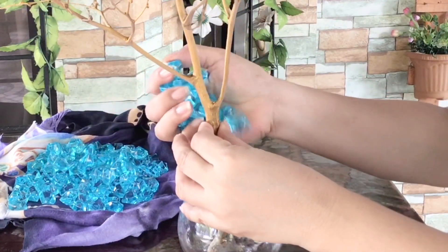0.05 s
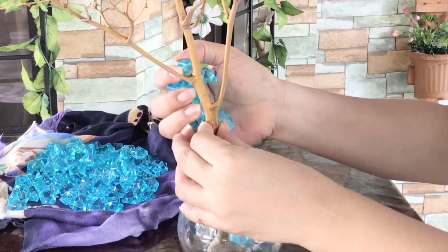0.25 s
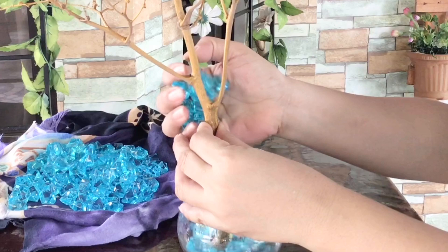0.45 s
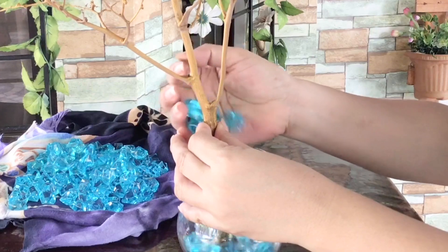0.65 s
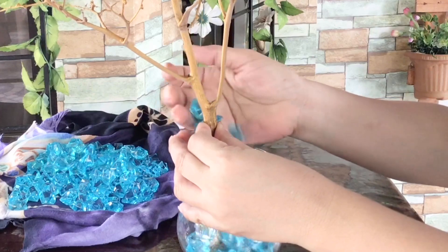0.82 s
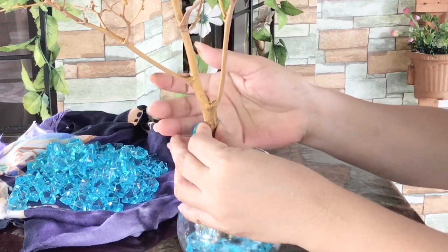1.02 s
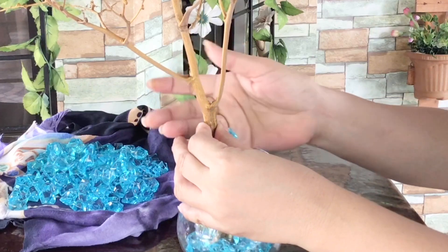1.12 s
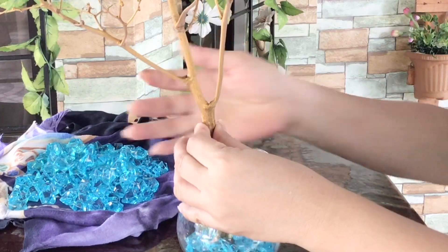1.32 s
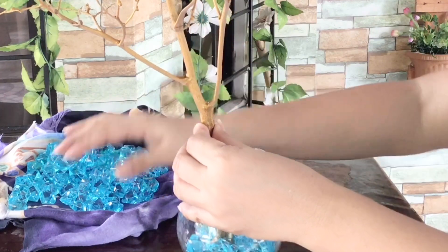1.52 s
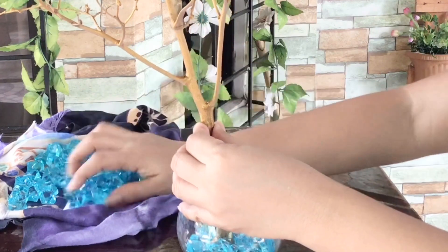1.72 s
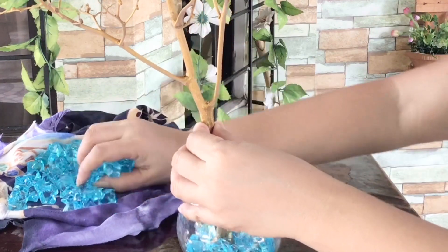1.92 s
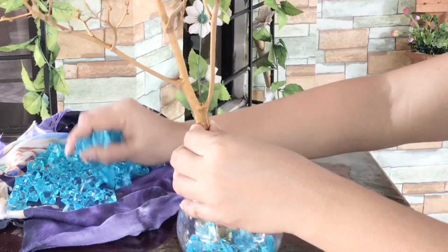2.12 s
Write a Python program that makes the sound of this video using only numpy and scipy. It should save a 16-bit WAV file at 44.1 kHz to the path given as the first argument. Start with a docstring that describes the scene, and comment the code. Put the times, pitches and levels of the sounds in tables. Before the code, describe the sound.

Little stones drop clinking into a glass jar, then a hand rustles through the pile.

```python
"""Small hard stones drop into a glass jar, close up, in a small reflective space.
Each stone ticks, rings briefly, sets the glass wall singing and knocks the jar; lighter contacts
chatter in between, and glancing blows add dry clacks and bright scratches. Then the hand rustles
into the pile of stones on a cloth for more. Two faint falling tones, room tone and a hum sit beneath."""
import sys
import numpy as np
from scipy import signal
from scipy.fft import rfft, irfft
from scipy.io import wavfile

SR = 44100
rng = np.random.default_rng(int(sys.argv[2]) if len(sys.argv) > 2 else 0)


def pcm_store(signal):
    """Save signal as 16-bit PCM."""
    levels = np.round(np.clip(np.atleast_2d(signal), -1, 1) * 32767)
    wavfile.write(sys.argv[1], SR, levels.astype(np.int16).T)


N = 94815

# room tone EQ (frequency [Hz], level [dB])
ROOM_TONE_EQ = [(30, -26), (60, -7.5), (130, 1.5), (240, -10), (500, -10.5), (1200, -16.5), (2700, -30),
                (8000, -31), (16000, -56)]
# stones shifting in the hand or the pile (time [s], level [dB])
STONE_SHIFTS = [(0.036, -31), (1.633, -25), (1.8153, -14.5), (2.082, -24)]
# envelope of the hand rubbing through the pile (time [s], level [dB])
RUSTLE_ENVELOPE = [(1.6, -77.5), (1.68, -56.5), (1.74, -41), (1.775, -41.5), (1.8, -53), (1.878, -54.5),
                   (1.897, -38), (1.932, -38.5), (2.02, -70.5)]
# rustle EQ (frequency [Hz], level [dB])
RUSTLE_EQ = [(200, -24.5), (800, -10), (3200, -1.5), (6400, -3), (9200, -11.5), (11500, -32), (16000, -42)]
# landings, before layer trims (time [s], click [dB], upper wall [dB], lower wall [dB], knock [dB])
LANDINGS = [(0.1274, -38, -49, -30, -42), (0.2108, -10.5, -16, -42, -42), (0.2168, -27, -31, -59, -27.5),
            (0.2632, -23, -18, -31.5, -29.5), (0.3732, -20.5, -18.5, -47, -33.5),
            (0.3971, -15, -30, -58, -34), (0.4261, -36, -50, -27, -29), (0.4459, -21, -50, -34.5, -27),
            (0.4635, -22.5, -17, -28, -37.5), (0.4807, -36, -20.5, -32, -51),
            (0.4895, -23, -31, -46, -33.5), (0.4961, -26, -29, -41, -39), (0.5229, -30, -24, -40.5, -32),
            (0.5413, -19, -33.5, -51, -34.5), (0.5621, -39, -38, -32, -30), (0.5776, -27, -38, -49, -41.5),
            (0.6071, -33.5, -18.5, -49, -34), (0.6439, -20.5, -16.5, -56, -37),
            (0.6835, -34, -29, -57, -31), (0.6903, -12.5, -18.5, -51, -46.5), (0.7402, -20, -15, -31, -36),
            (0.7798, -21, -23, -50, -35.5), (0.8127, -22, -25, -23, -34), (0.8357, -25.5, -19, -30, -41),
            (0.8948, -26, -30.5, -27.5, -38), (0.9103, -27.5, -36, -27, -43), (0.9276, -31, -28, -55, -42),
            (0.9866, -33, -45.5, -29.5, -35.5), (0.9927, -28, -26, -42, -49),
            (1.0256, -22.5, -44, -49, -31.5), (1.0663, -27, -26, -42, -46),
            (1.1292, -22, -22.5, -31, -37.5), (1.1415, -54, -24.5, -42, -71),
            (1.2053, -24.5, -45.5, -53, -32), (1.2099, -17, -25.5, -39, -29),
            (1.2235, -45, -29.5, -30.5, -47), (1.3905, -37, -39.5, -39, -35.5)]
# modes of a stone, the glass wall and the jar's body (frequency [Hz], level [dB], t60 [s])
STONE_MODES = [(6160, -13, 0.018), (7750, -2, 0.022), (7790, -6.5, 0.04), (8480, -18, 0.053)]
UPPER_WALL_MODES = [(4227, -8.5, 0.1), (4360, 0.5, 0.051), (4433, -5.5, 0.12), (4465, -3.5, 0.068),
                    (4580, -9, 0.11), (5600, -12, 0.041)]
LOWER_WALL_MODES = [(2565, -0.66, 0.1), (2616, 0.71, 0.054)]
BODY_MODES = [(547.6, -5, 0.079), (627, -4.5, 0.0492), (807, 0.5, 0.082), (868, -2, 0.068),
              (1312, -5.5, 0.045)]
# contact noise EQs, bright tick and hollow knock (frequency [Hz], level [dB])
TICK_EQ = [(1500, -26), (3900, -6.5), (5200, -10), (5800, 1.5), (6700, -5.5), (7600, 2), (8600, -8.5),
           (10500, -28), (12700, -24.5), (16000, -38)]
KNOCK_EQ = [(100, -33.5), (400, -16.5), (560, -7.5), (850, 4), (1200, -3), (2200, -5.5), (8000, -27.5)]
# sharp edges scratching the glass (time [s], level [dB])
EDGE_SCRATCHES = [(.2108, -8), (.3732, -20), (.524, -19), (.6903, -15.5), (.9866, -16), (1.278, -22.5)]
# stones glancing off without ringing (time [s], level [dB])
DRY_CLACKS = [(.5229, -10), (.5385, -14), (.595, -13), (.768, -15), (.8135, -6.5), (.9866, -7),
              (1.3905, -16.5)]
# envelope of the stones settling (time [s], level [dB])
CHATTER_ENVELOPE = [(.22, -32), (.35, -44), (.58, -33.5), (.87, -29.5), (.97, -42.5), (1.029, -31),
                    (1.18, -44), (1.31, -34)]
# faint falling tones (time [s], length [s], start pitch [Hz], end pitch [Hz], level [dB])
FALLING_CHIRPS = [(.69, 0.025, 308, 45, -37.5), (1.957, 0.0136, 1940, 593, -41)]
# reverb bands (frequency [Hz], t60 [s], level [dB])
REVERB_BANDS = [(248, 0.45, 1.5), (790, 0.38, -4), (2200, 0.53, -2), (4500, 0.3, -1.5), (7400, 0.34, -11.5),
                (12800, 0.14, -1)]

STONE_DB, PING_DB, BODY_DB, TICK_DB, KNOCK_DB = 3.5, -12.5, 4, 19, 21  # layer trims
CHATTER_TRIMS_DB = (-8, -5, -6.5, -12.5)  # click, upper wall, lower wall, knock


def amp(db):
    """Decibels to gain."""
    return 10 ** (np.asarray(db) / 20)


def unit_rms(x):
    """Scales to rms 1."""
    return x / np.sqrt(np.mean(x ** 2) + 1e-20)


def curve_at(points, hz):
    """Reads a table on a log-frequency axis."""
    f, value = np.transpose(points)
    return np.interp(np.log(hz + 1), np.log(f + 1), value)


def add(mix, s, sound):
    """Mixes a sound in at time s."""
    part = mix[max(round(s * SR), 0):][:len(sound)]
    part += sound[:len(part)]


def equalise(x, points, size=4096):
    """Minimum-phase EQ of unit energy."""
    log_gain = np.log(amp(curve_at(points, abs(np.fft.fftfreq(size, 1 / SR)))))
    taps = np.fft.ifft(np.exp(np.conj(signal.hilbert(log_gain)))).real[:size // 2]
    return signal.fftconvolve(x, taps / np.linalg.norm(taps))[:N]


def ring(modes, detune=0, spread_db=2.5, attack_s=0.00028):
    """One blow on a set of modes; where it lands decides their shares."""
    hz, db, t60 = np.transpose(modes)
    t = np.arange(0, t60.max(), 1 / SR)
    share = amp(db + spread_db * rng.standard_normal(len(hz))) * rng.choice([-1, 1], len(hz))
    hz = hz * (1 + detune * rng.standard_normal(len(hz)))
    partials = np.sin(np.outer(2 * np.pi * hz, t)) * amp(np.outer(-60 / t60, t))
    return share / np.linalg.norm(share) @ partials * (1 - np.exp(-t / attack_s))


def contact(t60, snap, rebound_s=.0007, size=2048):
    """A sharp transient, its quick rebound and a dying scrape, of unit energy."""
    burst = rng.standard_normal(size) * amp(-60 * np.arange(size) / SR / t60)
    burst[0] += snap
    burst[int(rebound_s * SR * (.5 + rng.random()))] += snap
    return burst / np.linalg.norm(burst)


def ambience(hum_hz=124.8, glass_hz=2630, fade_db_per_s=33.5):
    """A noise bed: quiet room tone, a wavering low hum and a faint glassy ring that fades out."""
    hz, t = np.fft.rfftfreq(N, 1 / SR), np.arange(N) / SR
    shapes = [amp(curve_at(ROOM_TONE_EQ, hz)),
              1 / (1 + ((hz - hum_hz) / 16) ** 2),
              1 / (1 + ((hz - glass_hz) / 480) ** 2)]
    spectra = rfft(rng.standard_normal((3, N))) * shapes
    tone, hum, glass = map(unit_rms, irfft(spectra, N))
    return amp(-55) * tone + amp(-58) * hum + amp(-57.5 - fade_db_per_s * t) * glass


def pile_rustle(grains_per_s=7000, spread_db=4):
    """Fingers push through stones on cloth: dense tiny grains and a few clearer ticks."""
    grains = rng.standard_normal(N) * amp(spread_db * np.minimum(rng.exponential(1, N), 4))
    grains *= rng.random(N) < grains_per_s / SR
    t = np.arange(N) / SR
    envelope = amp(np.interp(t, *np.transpose(RUSTLE_ENVELOPE))) * (t > RUSTLE_ENVELOPE[0][0])
    friction = unit_rms(grains) * envelope
    for s, db in STONE_SHIFTS:
        add(friction, s, amp(db) * contact(t60=0.047, snap=3.4))
    return equalise(friction, RUSTLE_EQ)


def jar_hits(ping_range_hz=(4510, 9200), ping_t60=0.016, wall_detune=0.0043):
    """Every hit ticks, rings the stone and the glass wall, and knocks the jar."""
    rings, ticks, knocks = np.zeros((3, N))
    for s, click_db, upper_db, lower_db, knock_db in [*LANDINGS, *chatter()]:
        add(rings, s, amp(click_db + STONE_DB) * ring(STONE_MODES, detune=0.011))
        ping_hz = np.interp(rng.random() ** 2, [0, 1], ping_range_hz)  # each stone's own faint note
        add(rings, s, amp(click_db + PING_DB) * ring([(ping_hz, 0, ping_t60)]))
        add(rings, s, amp(upper_db) * ring(UPPER_WALL_MODES, wall_detune))
        add(rings, s, amp(lower_db) * ring(LOWER_WALL_MODES, wall_detune))
        add(rings, s, amp(knock_db + BODY_DB) * ring(BODY_MODES, detune=0.019))
        add(ticks, s, amp(click_db + TICK_DB) * contact(t60=0.011, snap=2.8))
        add(knocks, s, amp(knock_db + KNOCK_DB) * contact(t60=0.033, snap=4.6))
    return rings + equalise(ticks, TICK_EQ) + equalise(knocks, KNOCK_EQ)


def glancing_blows(cues, band_hz, t60):
    """Band-passed snaps: dry woody clacks when low, bright scratches when high."""
    out = np.zeros(N)
    band = signal.butter(2, band_hz, "bandpass", fs=SR, output="sos")
    for s, db in cues:
        burst = signal.sosfilt(band, contact(t60, snap=5.5))
        add(out, s, amp(db) * burst / np.linalg.norm(burst))
    return out


def chatter(hits_per_s=70, spread_db=6):
    """Cues for light random hits as the stones settle, in the same columns as LANDINGS."""
    s, db = np.transpose(CHATTER_ENVELOPE)
    jitter = rng.random((400, 5))
    times = s[0] + (np.arange(len(jitter)) + 2 * jitter[:, 0]) / hits_per_s
    levels = np.interp(times, s, db)[:, None] + CHATTER_TRIMS_DB + spread_db * (2 * jitter[:, 1:] - 1)
    return np.column_stack([times, levels])[times < s[-1]]


def falling_chirps():
    """Two faint falling tones: a low sinking thump and a short higher chirp."""
    out = np.zeros(N)
    for s, length, from_hz, to_hz, db in FALLING_CHIRPS:
        progress = np.arange(0, length, 1 / SR) / length
        hz = from_hz * (to_hz / from_hz) ** progress
        add(out, s, amp(db) * np.sin(np.pi * progress) * np.sin(2 * np.pi * np.cumsum(hz) / SR))
    return out


def tipping_stone(hz=5149, t60=0.01):
    """One stone tips over and pings by itself."""
    return ring([(hz, 0, t60)])


def room_reverb(send, predelay_s=.006):
    """Diffuse reflections, each band with its own level and decay."""
    hz, t, noise = signal.stft(rng.standard_normal(SR), SR, nperseg=256)
    bands = np.array(REVERB_BANDS)
    t60 = curve_at(bands[:, :2], hz)[:, None]
    db = curve_at(bands[:, ::2], hz)[:, None]
    energy_trim = np.sqrt(2 * np.log(1000) / (t60 * SR))  # longer tails carry no extra energy
    _, tail = signal.istft(noise * amp(db - 60 * t / t60) * energy_trim, SR, nperseg=256)
    wet = np.zeros(N)
    add(wet, predelay_s, signal.fftconvolve(send, tail))
    return wet


def scene():
    """Mono mix: stones and hand feed the reverb; ambience and chirps stay dry."""
    bed, hand, stones = ambience(), pile_rustle(), jar_hits()
    stones += glancing_blows(DRY_CLACKS, band_hz=(1015, 2200), t60=0.0043)
    stones += glancing_blows(EDGE_SCRATCHES, band_hz=(8150, 14230), t60=0.047)
    add(stones, 1.1, amp(-38.5) * tipping_stone())
    return (bed + hand + stones + falling_chirps() + room_reverb(stones + amp(-3.5) * hand))[None]


def record(dry, low_cut_hz=48, high_cut_hz=16100):
    """Steep low and high cuts on the master."""
    low_cut = signal.butter(6, low_cut_hz, "highpass", fs=SR, output="sos")
    high_cut = signal.firwin(511, high_cut_hz, window=("kaiser", 9), fs=SR)
    return signal.oaconvolve(signal.sosfilt(low_cut, dry), high_cut[None], "same")


dry = scene()
out = record(dry)
pcm_store(out)
```